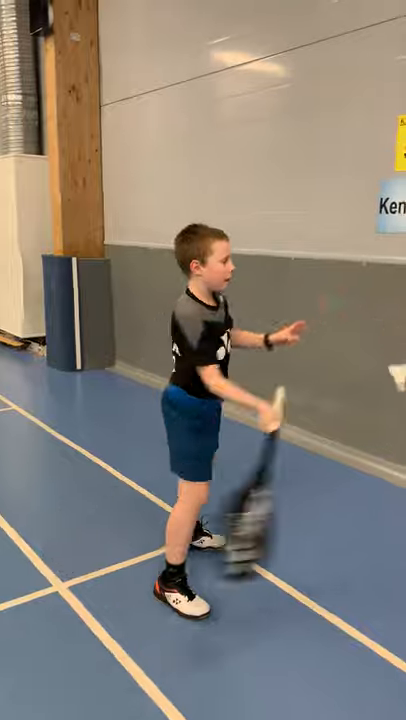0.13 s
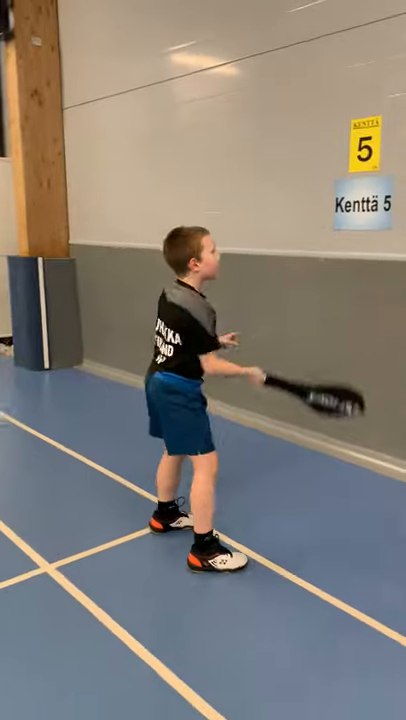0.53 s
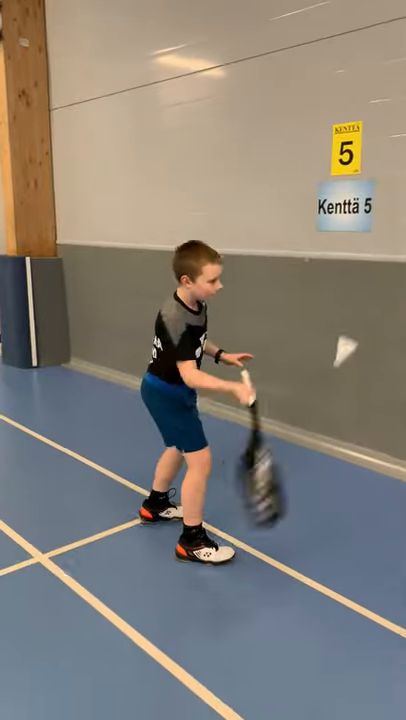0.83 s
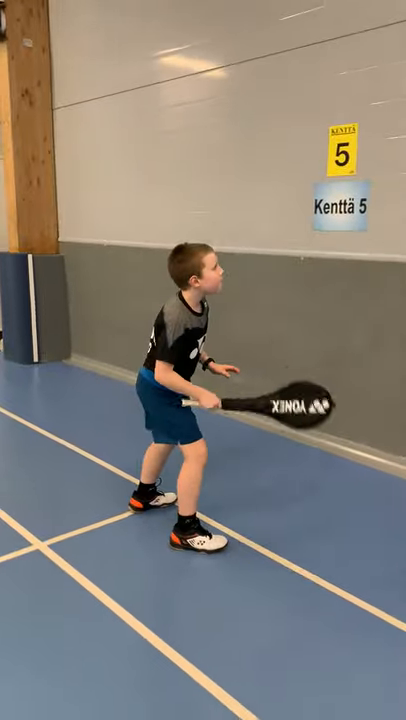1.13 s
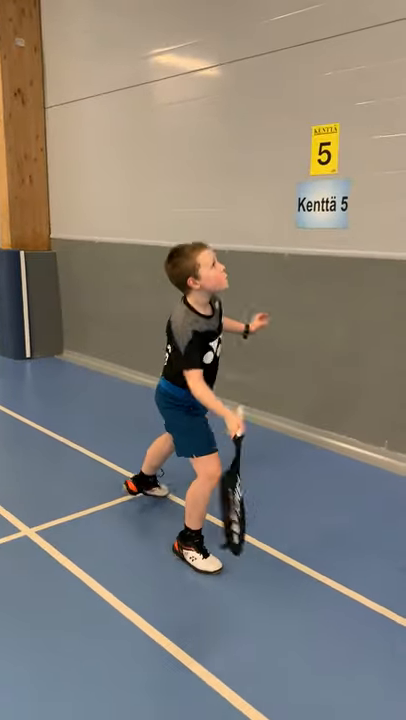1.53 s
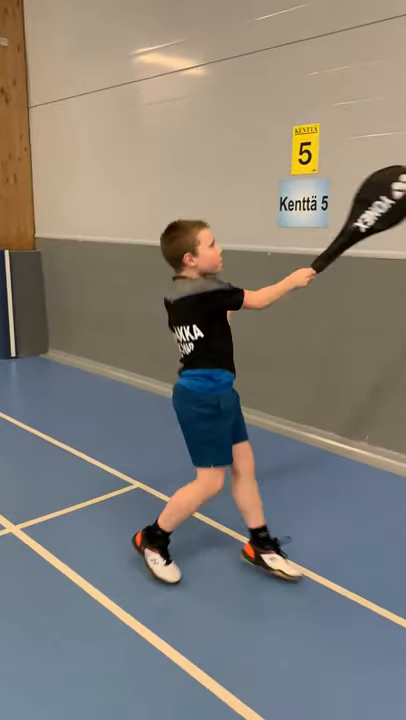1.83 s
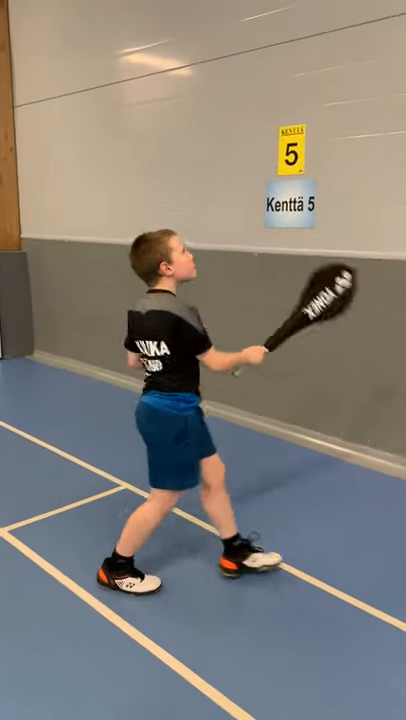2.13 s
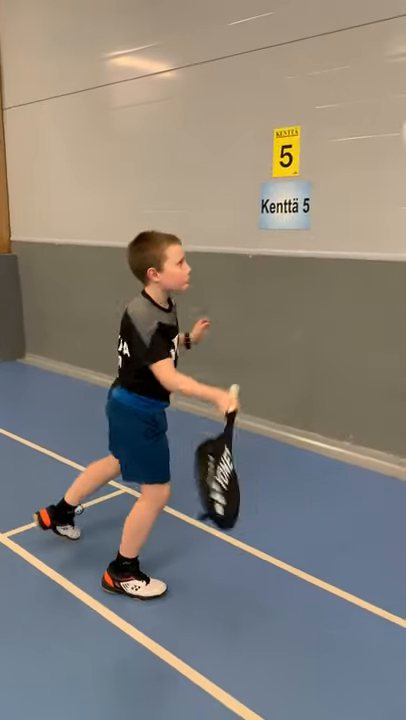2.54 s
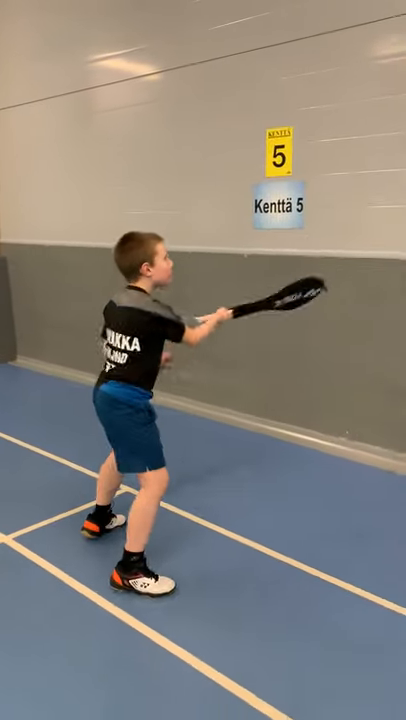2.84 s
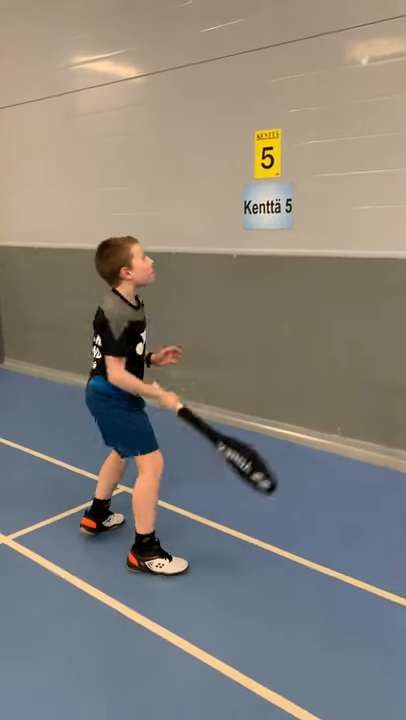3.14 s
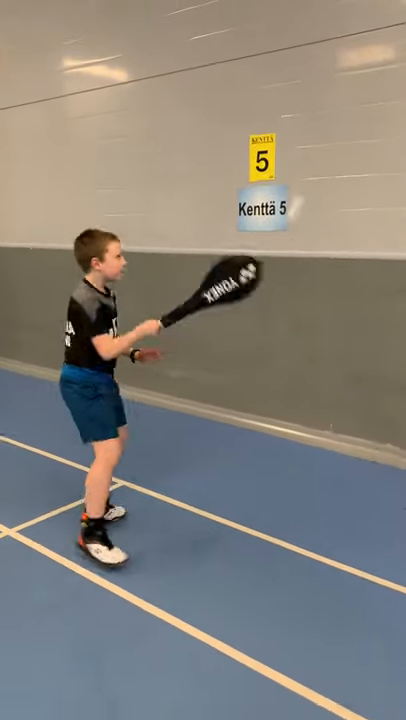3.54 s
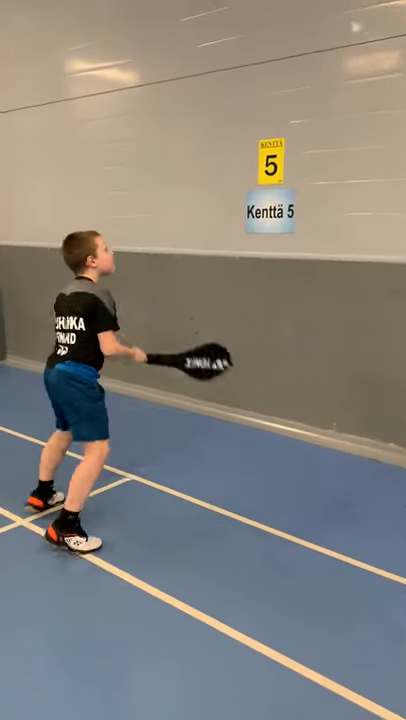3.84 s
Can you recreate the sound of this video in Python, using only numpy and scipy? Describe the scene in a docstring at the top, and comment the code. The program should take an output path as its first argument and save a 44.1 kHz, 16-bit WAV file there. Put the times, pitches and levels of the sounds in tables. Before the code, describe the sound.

A covered badminton racket strikes a shuttlecock at about 0.2, 0.9, 1.8, 2.7 and 3.5 seconds: a tick, hollow pat and sharp slap. A brief cork tock on the wall follows each 0.1 to 0.2 seconds later. Shoes stamp dully around 1.6 to 1.8; soft scuffs include one at 2.3. Long hall reverberation and steady rumble surround everything, with a low drone swelling near 0.8. Close stereo phone pickup.

```python
"""A racket in its cloth cover knocks a shuttlecock against the wall of a large sports hall, five times.
Over steady rumble, a low drone swells and sinks early on. Each stroke is a tick and a hollow pat of
damped cover modes, then a sharper slap and cracks off the floor. A cork 'tock' on the wall follows.
Shoes scuff as filtered noise and, most heavily midway, stamp as tones falling in pitch.
Frequency-dependent decay rings on after each; two microphone ports of a phone hear it all."""
import sys
import numpy as np
from scipy import signal
from scipy.fft import rfft, irfft, next_fast_len
from scipy.io import wavfile
from scipy.ndimage import uniform_filter1d

SR = 44100
rng = np.random.default_rng(int(sys.argv[2]) if len(sys.argv) > 2 else 0)


def log_audio(samples):
    """Write samples as a 16-bit WAV file to the path given in sys.argv[1]."""
    # one column per channel
    frames = np.atleast_2d(samples).T
    # limit to full scale, then quantise
    limited = np.clip(frames, -1, 1)
    pcm = np.round(limited * 32767).astype(np.int16)
    wavfile.write(sys.argv[1], SR, pcm)


N = 176400
T = np.arange(4096) / SR  # time axis of one impact, s

# Racket strokes: t/s, left pat level/dB, right pat level/dB, pat f/Hz, boom level/dB, tick level/dB,
# floor delay/s, slap level/dB, second crack level/dB, hall level/dB, far-wall slap level/dB
STROKE_EVENTS = [(0.1908, -7, -11, 502, -31, -13, 0.0066, -3.5, -8.5, 1, -14),
                 (.8630, -10.5, -7, 623, -12, -12.5, 0.0091, -5, -6.5, 1.5, -11.5),
                 (1.7616, -13, -8.5, 610, -16, -14.5, .0075, -2.5, -7.5, 1.5, -18),
                 (2.6566, -11, -5, 600, -13.5, -15, .0082, -3.5, -5, 2.5, -13),
                 (3.477, -10, -2, 705, -12, -16, 0.0098, -4.5, -7.5, 3, -15)]
# Modes of the covered racket: frequency ratio to the pat, level/dB, time to peak/s
COVER_MODES = [(1, 0, 0.0034), (1.9, -7.5, 0.0023), (2.7, -34, 0.0014), (3.8, -19, 0.0048),
               (6, -33, 0.0019)]
# Modes of the slap: f/Hz, level/dB, time to peak/s
SLAP_MODES = [(732, -2.5, 0.0016), (1287, -1.5, 0.00066), (2190, -8, 0.00044), (4270, -17, 0.00018)]
# Far-wall returns of the slap: delay after the floor copy/s
WALL_DELAYS = (0.018, .0245)
# Spectrum of a tick: f/Hz, level/dB
CRACK_SPECTRUM = [(800, -58), (3000, 3), (6000, -5.5), (10000, -7), (16000, -8.5)]
# Rattle spectrum of the loose cover: f/Hz, level/dB
FLAP_SPECTRUM = [(200, -28), (500, -21), (1200, 1), (2300, 10), (4000, -22), (8000, -28)]
# Spectrum a stroke sends into the hall: f/Hz, level/dB
STROKE_SPREAD = [(80, -21), (200, -14), (400, -8.5), (700, 1), (1300, -10), (2200, -14), (3500, -20),
                 (6000, -28.5), (15000, -38)]
# Stroke reflections from the nearest walls: delay/s, level/dB
STROKE_REFLECTIONS = [(.0215, -21), (.055, -14)]
PAT_SAG_PER_S, PAT_LEFT_DELAY_S = 14, 0.00149
SLAP_PITCH_SPREAD = .08  # standard deviation of the frequency ratio
BOOM_HZ, BOOM_PEAK_S = 325, 0.0031
CRACK_T60_S, CRACK_GAP_S, FIRST_CRACK_DB = .0032, 0.0026, -2  # first crack relative to the second
RUSTLE_DB, RUSTLE_T60_S = -11, .045  # cloth noise relative to the tick
FLAP_DB, FLAP_T60_S = -13, .035  # rattle relative to the pat

# Wall hits: t/s, left level/dB, right level/dB, cork f/Hz, tick level/dB,
# floor delay/s, floor copy level/dB, hall level/dB
TOCK_EVENTS = [(0.3081, -19, -3, 1217, -10, .0039, -6, 8),
               (1.067, -15, -13, 1300, -19.5, 0.0046, -2.5, 0.5),
               (1.9562, -6.5, -6.5, 1245, -17, 0.0043, -1, 2.5),
               (2.83, -10.5, -6.5, 1340, -12, 0.00465, -2.5, 2),
               (3.6751, -6, -6, 1280, -15.5, 0.004, -4.5, 4.5)]
# Modes of the cork: frequency ratio to the tock, level/dB, time to peak/s
CORK_MODES = [(1, 0, .0023), (.55, -17, .002), (.8, -15, .0015), (1.6, -19, .0012), (2.3, -23, .001)]
# Dull noise spectrum of the wall panel: f/Hz, level/dB
PANEL_SPECTRUM = [(200, -7), (600, -2.5), (1300, -0.5), (2500, 1), (5000, -24.5)]
# Spectrum a tock sends into the hall: frequency ratio to the tock, level/dB
TOCK_HALL_SPREAD = [(.1, -34), (.5, -20), (.82, -14), (.95, 0), (1.05, 0), (1.17, -16), (2, -24), (4, -32),
                    (12, -38)]
# Tock reflections from the nearest walls: delay/s, level/dB
TOCK_REFLECTIONS = [(0.011, -18), (.027, -32)]
TOCK_LEFT_DELAY_S = .0007
PANEL_DB, PANEL_T60_S = -9.5, 0.02  # relative to the right tock
FEATHER_DB, FEATHER_T60_S = -11.5, 0.083  # skirt noise relative to the tick

# Footfalls: t/s, level/dB, starting f/Hz, pitch-fall rate/(1/s), time to peak/s,
# deep push level/dB, hall level/dB
STAMP_EVENTS = [(1.549, -31, 624, 7.8, 0.0027, -43, -15), (1.6059, -8, 449, 119, 0.005, -20, -11.5),
                (1.6205, -7.5, 534, 96, 0.0031, -20, -4.5), (1.672, -13, 436, 96, 0.0023, -27, -1.5),
                (1.814, -11, 295, 160, 0.0019, -25.5, -22.5), (1.219, -50, 194, 19, 0.0042, -27, -18),
                (3.22, -28.5, 196, 1.9, 0.016, -35, -7), (3.656, -29.5, 212, 1.2, 0.017, -55, -25),
                (3.901, -57, 220, 11, 0.0086, -31, -10.5)]
PUSH_HZ, PUSH_SAG_PER_S, PUSH_PEAK_S = 168, 82, 0.0034
THUD_HZ, THUD_PEAK_S, THUD_DB = 77.5, 0.025, 0  # lowest give of the floor, relative to the push

# Shoe scuffs: t/s, hiss level/dB, rise time constant/s, t60/s, click level/dB before a common cut
SCUFF_EVENTS = [(0.454, -38.5, 0.019, 0.15, -67), (.72, -42.5, 0.043, 0.17, -70),
                (1.2017, -51.5, 0.0107, 0.26, -57), (1.324, -39, 0.018, 0.12, -50),
                (1.592, -64, 0.01, 0.083, -36), (1.605, -58, .004, 0.069, -27),
                (1.617, -57, 0.0048, 0.3, -30.5), (1.67, -47, 0.027, 0.54, -50),
                (2.3237, -32.5, 0.0066, 0.31, -11), (2.5731, -57, 0.0047, 0.16, -28),
                (2.9712, -39.5, 0.015, 0.62, -19), (3.11, -46, 0.019, 0.44, -83),
                (3.601, -62, 0.017, 0.23, -67), (3.819, -48, 0.015, 0.12, -68),
                (3.889, -48, 0.0028, 0.072, -44), (3.9036, -52.5, .003, 0.64, -25),
                (3.98, -40.5, 0.0041, 0.83, -48)]
# Hiss spectrum of rubber soles: f/Hz, level/dB
RUBBER_SPECTRUM = [(1200, -41), (2200, 8), (3500, 9), (6500, 7), (8700, -0.5), (12000, -0.5), (16000, -10)]
CLICK_T60_S, CLICK_CUT_DB = 0.035, -12

# Hall reverberation: f/Hz, t60/s
HALL_DECAY = [(80, 3.1), (300, 5.14), (1000, 3.36), (3000, 1.45), (6000, 1.02), (14000, 0.37)]
# Tone of the reverberation: f/Hz, level/dB
HALL_SPECTRUM = [(80, 16), (300, -4), (700, -2.5), (1300, 2), (2500, 2.5), (5000, 0.5), (9000, -0.5),
                 (15000, 5)]
EARLY_DB, EARLY_T60_S = 4.5, 0.15  # louder, faster-dying first part of the tail
HALL_DELAY_S, BUILD_S = .005, .007  # onset and its time constant
ECHO_THIN_HZ, ECHO_DULL_HZ = 725, 3440  # highpass and lowpass corners of wall echoes
# Gain into the hall, to which each event adds its own level where it has one
WET_STROKE_DB, WET_TOCK_DB, WET_STAMP_DB, WET_SCUFF_DB = 24.5, 18.5, 3.5, -5

# Relative spectral density of the hall rumble: f/Hz, level/dB
RUMBLE_SPECTRUM = [(15, -40), (35, -4.5), (108, -5.5), (170, -12.5), (405, -7), (451, -7.5), (962, -18),
                   (1040, -15.5), (1650, -22.5), (3920, -39), (8590, -63.5), (12000, -69.5), (16000, -65)]
# Deepest rumble over time: t/s, level/dB
DEEP_LEVEL = [(0, -64), (.6, -36.5), (1.25, -35), (1.5, -42.5), (1.9, -31), (2.4, -44), (3, -60),
              (3.6, -42), (4, -32)]
# Low drone over time: t/s, level/dB
DRONE_LEVEL = [(.2, -59), (.4, -43), (.75, -34.5), (1.0, -35), (1.2, -45), (1.4, -49)]
RUMBLE_DB = -34
DEEP_HZ, DEEP_WIDTH_HZ = 76, 14
DRONE_HZ, DRONE_WIDTH_HZ, DRONE_STEADY = 115, 17, .6  # last: sine amplitude beside unit-RMS noise
WHINE_HZ, WHINE_WIDTH_HZ, WHINE_DB = 13790, 60, -80

# Likeness of the two ports in a diffuse field: f/Hz, correlation
PORT_LIKENESS = [(250, 0.91), (500, 0.17), (900, 0.13), (1500, 0.6), (1900, 0.64), (2500, 0.59),
                 (3500, 0.26), (4500, 1), (16000, 0.98)]
# Right port relative to left for diffuse sound: f/Hz, level/dB
RIGHT_PORT_GAIN = [(300, -0.5), (600, 2.5), (1200, 0.5), (3000, 0)]
# Phase by which the left port leads: f/Hz, phase/rad
LEFT_LEAD = [(0, 0), (1200, 0), (1900, .9), (2600, 2.5), (3500, 1.8), (4000, 2), (4750, 3.14),
             (15400, 19.2), (17000, 19.2)]
# Top of the microphone band: f/Hz, level/dB
TOP_ROLLOFF = [(15600, 0), (15900, -24), (16500, -13), (16900, -40)]
PATCHY_DB, STRAND_DB = 1.8, 2.2  # RMS depth of random gain
START_S, FADE_IN_S, TOP_HZ = .035, 0.0013, 16900
LOW_CUT_HZ, MONO_BELOW_HZ, CEILING = 87, 200, 0.95  # ceiling in full-scale amplitude


def strokes():
    """Modal excitation: tick and pat of the cover, then a floor-reflected slap with two cracks."""
    out = []
    for (s, left, right, hz, boom_db, tick_db, after,
         slap_db, crack_db, wet_db, wall_db) in STROKE_EVENTS:
        pat = [amp(db) * modes(COVER_MODES, hz, 0.0001 + late, PAT_SAG_PER_S, order=2)
               for db, late in ((left, PAT_LEFT_DELAY_S), (right, 0))]
        # each port hears the slap at its own level, delay and random pitch
        slap = [amp(slap_db + db) * modes(SLAP_MODES, slap_pitch(), after + late)
                for db, late in ((-3, 0.0012), (3.5, 0.0008))]
        cracks = tick(tick_db) + tick(crack_db + FIRST_CRACK_DB, after)
        cracks = cracks + tick(crack_db, after + CRACK_GAP_S)
        cloth = tick(tick_db + RUSTLE_DB, 0, RUSTLE_T60_S)
        cloth = cloth + tick(crack_db - 22.5, after, RUSTLE_T60_S)
        boom = amp(boom_db) * burst(BOOM_HZ, BOOM_PEAK_S, 0.00082)
        flap = [tick(db + FLAP_DB, 0.00081, FLAP_T60_S, FLAP_SPECTRUM)
                for db in ((left + right) / 2, right)]
        # the lowest slap mode is absent from the far-wall returns
        wall = sum(amp(wall_db) * modes(SLAP_MODES[1:], slap_pitch(), after + late)
                   for late in WALL_DELAYS)
        sound = np.add(pat, slap) + flap + wall + cracks + cloth + boom
        sent = coloured_impulse(300, lambda f: along(STROKE_SPREAD, f))
        out.append((s - .0003, sound, amp(WET_STROKE_DB + wet_db) * sent))
    return place(out, STROKE_REFLECTIONS)


def slap_pitch():
    """Random detuning: a frequency ratio near one, drawn for each port and each wall return."""
    return rng.normal(1, SLAP_PITCH_SPREAD)


def tocks():
    """Damped modal ringing: the cork sounds for a few cycles and again by floor reflection."""
    out = []
    for s, left, right, hz, tick_db, after, again_db, wet_db in TOCK_EVENTS:
        ring = []
        for db, late in ((left, TOCK_LEFT_DELAY_S), (right, 0)):
            direct = modes(CORK_MODES, hz, late, order=2)
            reflected = amp(again_db) * modes(CORK_MODES, hz, late + after, order=2)
            ring.append(amp(db) * (direct + reflected))
        ticks = tick(tick_db) + tick(tick_db - 2.0, after)
        feathers = tick(tick_db + FEATHER_DB, 0, FEATHER_T60_S)
        panel = tick(right + PANEL_DB, 0, PANEL_T60_S, PANEL_SPECTRUM)
        sound = np.array(ring) + ticks + feathers + panel
        sent = coloured_impulse(150, lambda f: along(TOCK_HALL_SPREAD, f / hz))
        out.append((s - .0003, sound, amp(WET_TOCK_DB + wet_db) * sent))
    return place(out, TOCK_REFLECTIONS)


def stamps():
    """Wave spreading through the floor: a thump falls in pitch over a deep push and thud."""
    out = []
    for s, db, hz, sag, swell, push_db, wet_db in STAMP_EVENTS:
        thump = amp(db) * burst(hz, swell, 0, sag)
        thump = thump + amp(push_db) * burst(PUSH_HZ, PUSH_PEAK_S, 0, PUSH_SAG_PER_S)
        thud = amp(push_db + THUD_DB) * burst(THUD_HZ, THUD_PEAK_S, 0)
        both_ports = (thump + thud) * np.ones((2, 1))
        out.append((s, both_ports, amp(WET_STAMP_DB + wet_db) * thump))
    return place(out, [])


def scuffs():
    """Friction noise: grainy treble hiss of rubber soles, each with an opening click, some faint."""
    t, shape, clicks = np.arange(N) / SR, np.zeros(N), np.zeros((1, N))
    for s, db, rise, t60, click_db in SCUFF_EVENTS:
        since = np.maximum(t - s, 0)
        shape += amp(db - 60 * since / t60) * (1 - np.exp(-since / rise))
        add(clicks, s - .0003, tick(click_db + CLICK_CUT_DB, 0, CLICK_T60_S)[None])
    # grain: random level on three time scales (RMS depth/dB, smoothing/samples)
    grain_db = sum(db * unit(uniform_filter1d(rng.standard_normal(N), size=k))
                   for db, k in ((0.79, 90), (2.8, 900), (1.9, 2500)))
    noise = amp(grain_db) * rng.standard_normal(N)
    hiss = unit(filtered(noise, lambda hz: amp(along(RUBBER_SPECTRUM, hz))))
    direct = clicks[0] + shape * hiss
    return direct * np.ones((2, 1)), amp(WET_SCUFF_DB) * hall(direct)[:, :N]


def background():
    """Band-limited noise: rumble with a swaying deep end, an early drone and a faint lamp whine."""
    t = np.arange(N) / SR
    rumble = unit(filtered(rng.standard_normal((2, N)), lambda hz: amp(along(RUMBLE_SPECTRUM, hz))))
    drone = narrow_noise(DRONE_HZ, DRONE_WIDTH_HZ)
    drone = unit(drone + DRONE_STEADY * np.sin(2 * np.pi * DRONE_HZ * t))
    whine = narrow_noise(WHINE_HZ, WHINE_WIDTH_HZ)
    deep = narrow_noise(DEEP_HZ, DEEP_WIDTH_HZ)
    near = amp(np.interp(t, *np.transpose(DEEP_LEVEL))) * deep
    near = near + amp(np.interp(t, *np.transpose(DRONE_LEVEL))) * drone
    return near + amp(WHINE_DB) * whine, amp(RUMBLE_DB) * rumble


def narrow_noise(centre, width):
    """Gaussian bandpass: white noise confined about one frequency, at unit RMS."""
    return unit(filtered(rng.standard_normal(N), lambda hz: np.exp(-((hz - centre) / width) ** 2)))


def burst(hz, swell, late, sag=0, phase=0, order=1):
    """Damped oscillation: a sine peaks, dies (more abruptly at higher order) and may sink in pitch."""
    t = np.maximum(T - late, 0)
    turns = hz * (1 - np.exp(-sag * t)) / sag if sag else hz * t
    envelope = (t / swell) ** 2 * np.exp(2 / order * (1 - (t / swell) ** order))
    return envelope * np.sin(2 * np.pi * turns + phase)


def modes(table, pitch, late, sag=0, order=1):
    """Modal superposition: resonances of a body, with random level and phase at each call."""
    chance = rng.normal(0, [1.5, .5], (len(table), 2))  # level/dB, phase/rad
    return sum(amp(db + up_db) * burst(pitch * k, swell, late, sag, phase, order)
               for (k, db, swell), (up_db, phase) in zip(table, chance))


def tick(db, late=0, t60=CRACK_T60_S, colour=CRACK_SPECTRUM):
    """Exponential decay: a burst of coloured noise, by default a very short bright crack."""
    t = T - late - .0003  # most sources start 0.3 ms early to make up for this
    shape = (t >= 0) * amp(-60 * np.abs(t) / t60)
    crack = filtered(shape * rng.standard_normal(len(T)), lambda hz: amp(along(colour, hz)))
    return amp(db - 7.0) * unit(crack) * np.sqrt(np.mean(shape ** 2))


def coloured_impulse(sample, level_db):
    """Impulse excitation: one unit sample given a spectrum without phase shift."""
    return filtered(1. * (T == T[sample]), lambda f: amp(level_db(f)))


def place(sounds, echoes):
    """Superposition of paths: direct sound, thinner and duller wall echoes, and reverberation."""
    near, far = np.zeros((2, N)), np.zeros((2, N))
    for s, x, sent in sounds:
        add(near, s, x)
        dull = filtered(x, lambda hz: 1j * hz / (ECHO_THIN_HZ + 1j * hz) / (1 + 1j * hz / ECHO_DULL_HZ))
        for late, db in echoes:
            add(near, s + late, amp(db + rng.normal(0, 0.7, (2, 1))) * dull)
        add(far, s, hall(sent))
    return near, far


def hall(x):
    """Reverberant decay: noise with a quick early part over a ring that dies by frequency."""
    hz, t, z = signal.stft(rng.standard_normal((2, 70000)), SR, nperseg=256)
    shape = amp(-60 * t / along(HALL_DECAY, hz)[:, None]) + amp(EARLY_DB - 60 * t / EARLY_T60_S)
    tone = amp(along(HALL_SPECTRUM, hz))[:, None]
    tail = signal.istft(z * shape * tone, SR, nperseg=256)[1]
    since = np.maximum(np.arange(tail.shape[1]) / SR - HALL_DELAY_S, 0)
    tail = tail * (1 - np.exp(-since / BUILD_S)) / 80
    return signal.fftconvolve(x[None], tail, axes=1)


def patchy(x):
    """Spectral fluctuation: gain patches of 300 Hz by 40 ms and thin strands, shared by both ports."""
    z = signal.stft(x, nperseg=512)[2]
    field = uniform_filter1d(rng.standard_normal(z.shape[1:]), size=4, axis=0)
    field = uniform_filter1d(field, size=7, axis=1)
    strands = uniform_filter1d(rng.standard_normal(z.shape[1:]), size=30, axis=1)
    gain = amp(PATCHY_DB * unit(field) + STRAND_DB * unit(strands))
    return signal.istft(z * gain, nperseg=512)[1][:, :N]


def diffuse(pair):
    """Diffuse-field coherence: two unrelated signals are mixed to the likeness of the ports."""
    def mix(hz):
        angle = np.arccos(np.clip(along(PORT_LIKENESS, hz), 0, 1)) / 2
        return np.array([np.cos(angle), np.sin(angle)])

    mid, side = filtered(pair, mix)
    ports = np.array([mid + side, mid - side])
    return filtered(ports, lambda hz: amp(np.outer([-.5, .5], along(RIGHT_PORT_GAIN, hz))))


def amp(db):
    """Decibel law: level to amplitude ratio."""
    return 10 ** (np.asarray(db) / 20)


def unit(x):
    """Normalisation: scale to an RMS of one."""
    return x / np.sqrt(np.mean(x ** 2) + 1e-20)


def along(points, hz):
    """Logarithmic frequency scale: interpolate (f, value) points."""
    f, v = np.transpose(points)
    return np.interp(np.log(hz + 1), np.log(f + 1), v)


def filtered(x, response):
    """Linear filtering: multiply the spectrum of x by a response of f/Hz."""
    n = x.shape[-1]
    m = next_fast_len(n + 4096)
    return irfft(rfft(x, m) * response(np.fft.rfftfreq(m, 1 / SR)), m)[..., :n]


def add(track, s, x):
    """Superposition: mix x into track from time s, up to its end."""
    part = track[:, round(s * SR):][:, :x.shape[-1]]
    part += x[..., :part.shape[1]]


def scene():
    """Direct plus diffuse field: the near sounds and the patchy reverberation and rumble add."""
    near, far = zip(strokes(), tocks(), stamps(), scuffs(), background())
    return sum(near) + diffuse(patchy(sum(far)))


def record(dry):
    """Two-port reception: mono bass, phase lead, soft ceiling, band limit and a silent start."""
    on = np.clip((np.arange(N) / SR - START_S) / FADE_IN_S, 0, 1)

    def low_cut(hz, edge_hz):
        return np.abs((1j * hz / edge_hz / (1 + 1j * hz / edge_hz)) ** 2)

    def port_phase(hz):
        return np.exp(.5j * np.outer([1, -1], np.interp(hz, *np.transpose(LEFT_LEAD))))

    mid = dry.mean(0)
    side = filtered((dry[0] - dry[1]) / 2, lambda hz: low_cut(hz, MONO_BELOW_HZ))
    ports = np.array([mid + side, mid - side]) * on
    x = filtered(ports, lambda hz: port_phase(hz) * low_cut(hz, LOW_CUT_HZ))
    x = x / (1 + np.abs(x / CEILING) ** 6) ** (1 / 6)
    return filtered(x, lambda hz: amp(along(TOP_ROLLOFF, hz)) * (hz < TOP_HZ))


dry = scene()
out = record(dry)
log_audio(out)
```